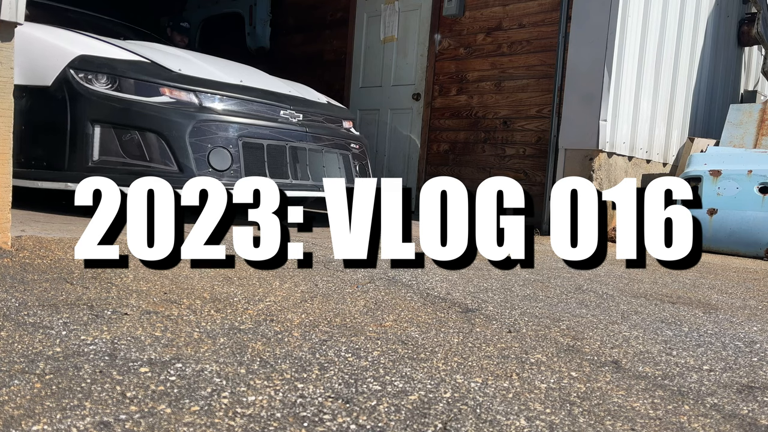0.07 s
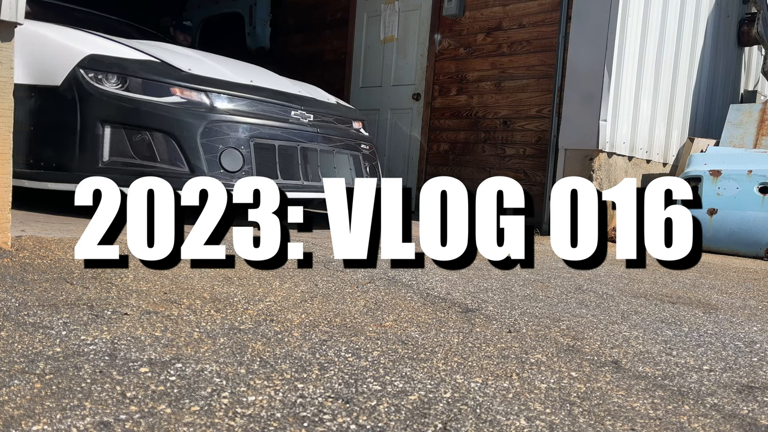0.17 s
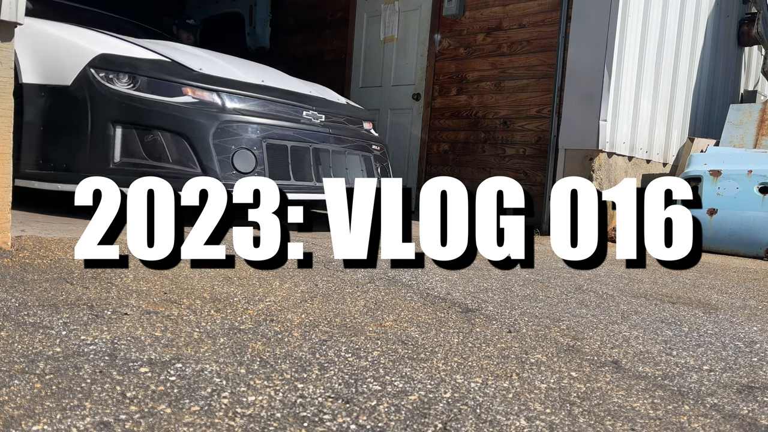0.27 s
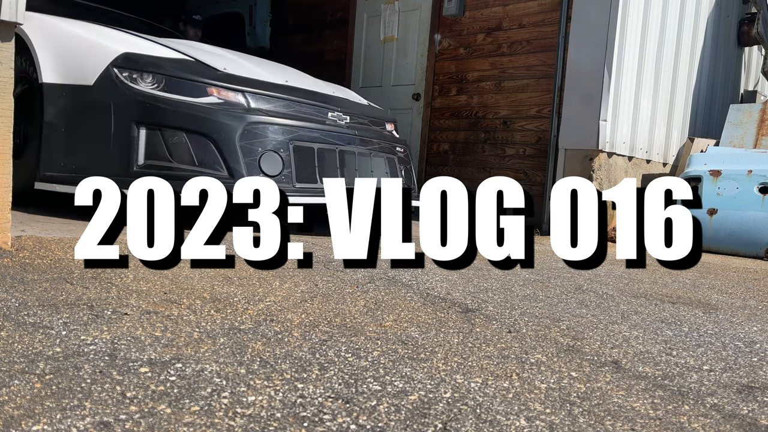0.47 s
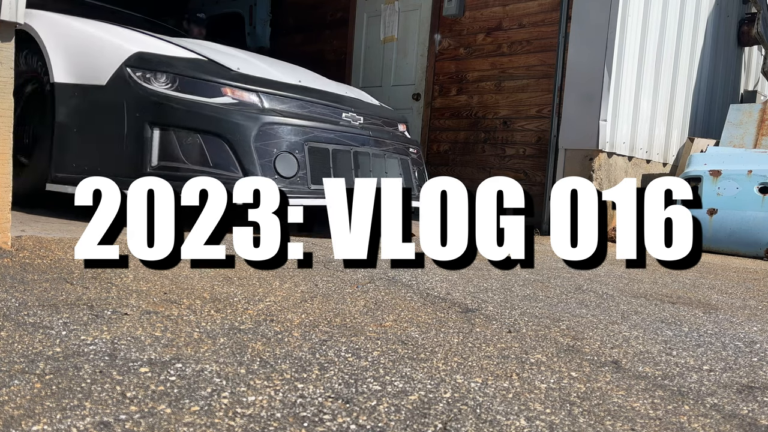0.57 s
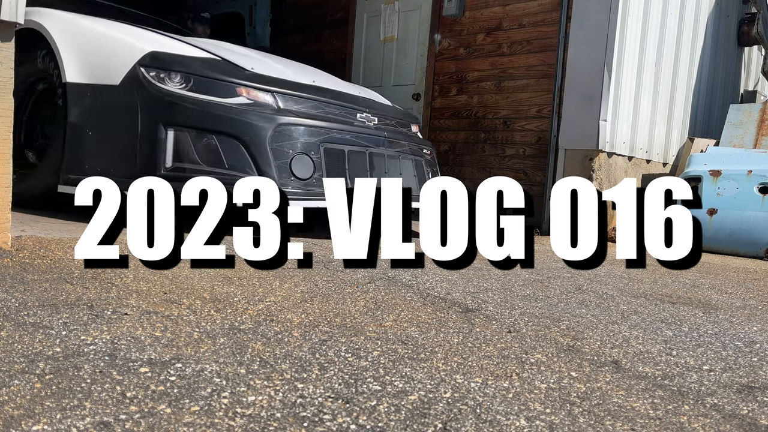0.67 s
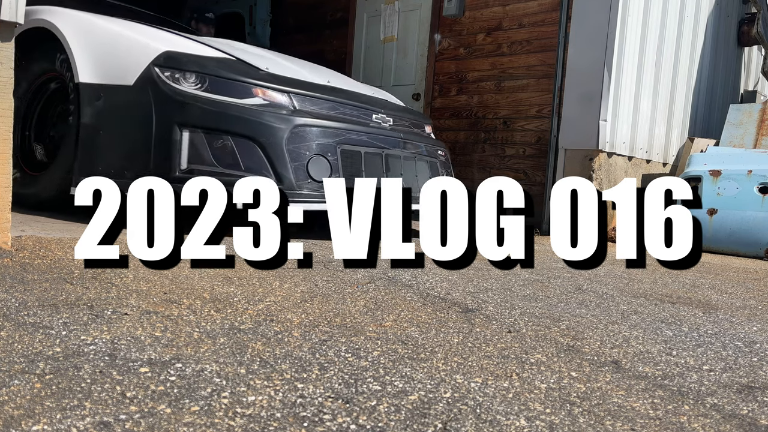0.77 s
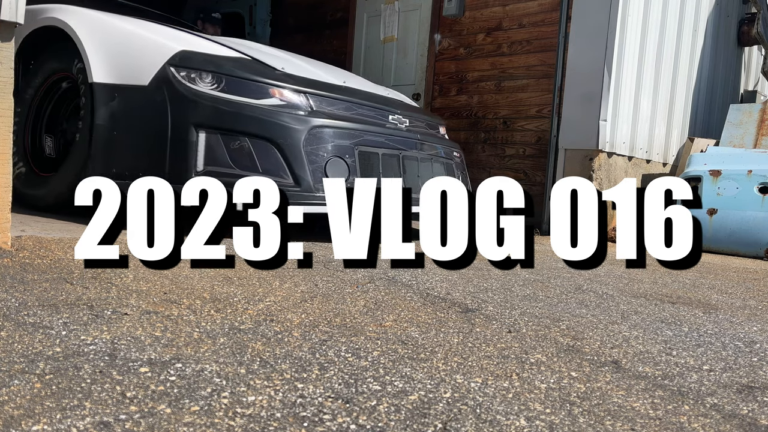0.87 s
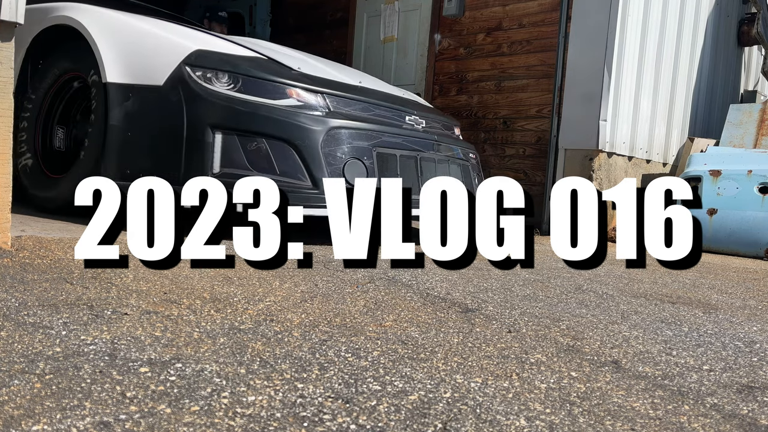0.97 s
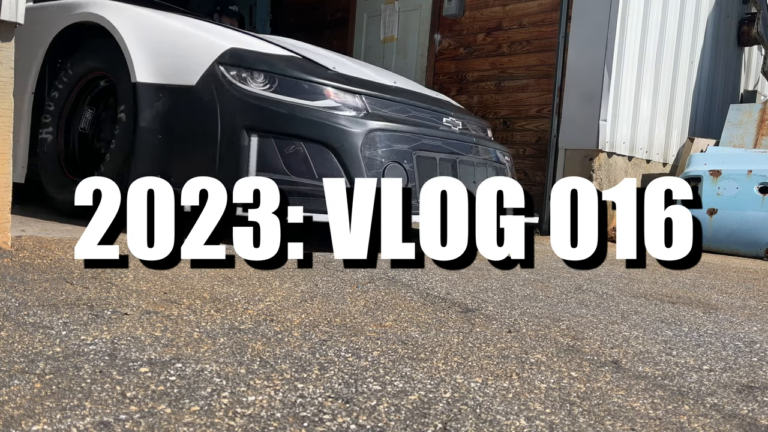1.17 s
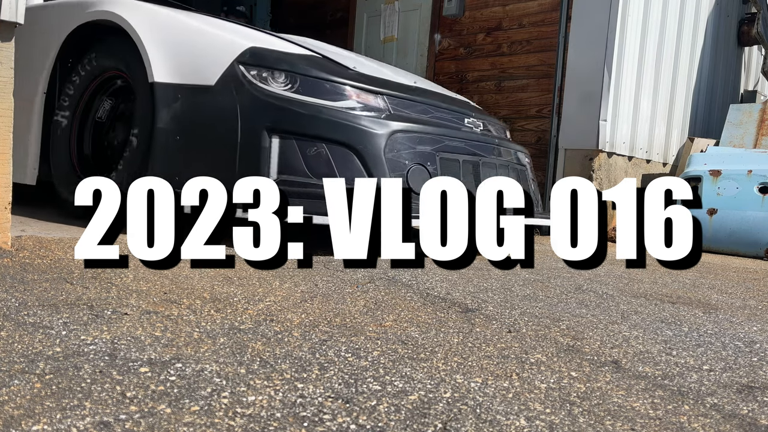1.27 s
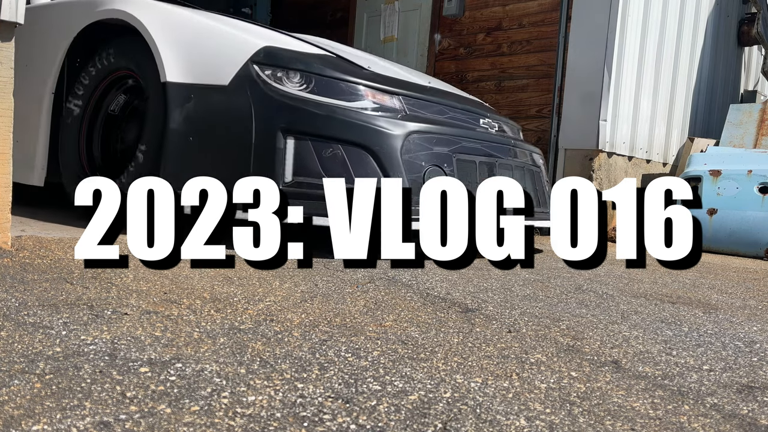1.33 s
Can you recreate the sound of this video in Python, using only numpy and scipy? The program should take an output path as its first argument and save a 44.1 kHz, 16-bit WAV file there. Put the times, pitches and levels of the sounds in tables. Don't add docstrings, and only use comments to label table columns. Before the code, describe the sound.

Close ground-level stereo pickup of a slow rolling tyre: quiet low rumble and thin grit hiss, a sharp knock midway, then dense crackling stones and deep bumps near the end, without any engine.

```python
import sys
import numpy as np
from scipy import signal
from scipy.fft import rfft, irfft, next_fast_len
from scipy.io import wavfile
from scipy.ndimage import uniform_filter1d

SR = 44100
rng = np.random.default_rng(int(sys.argv[2]) if len(sys.argv) > 2 else 0)


def to_wav(s):
    ch = np.atleast_2d(s).T
    pcm = np.round(np.clip(ch, -1, 1) * 32767)
    wavfile.write(sys.argv[1], SR, pcm.astype(np.int16))


def to_linear_factor(level_db):
    exponent = np.asarray(level_db, float) / 20
    return 10 ** exponent


N = 107515

# start [t/s], length [t/s], level [dB], narrow resonance [f/Hz]
RUBBER_SLIPS = [
    (0.25, .11, -62.5, 2460),
    (0.273, 0.097, -64, 2810),
    (.3, .06, -69, 3600),
    (0.26, .04, -65, 3200),
    (0.28, .075, -63, 4280),
    (.285, 0.053, -68.5, 4730),
    (0.35, .03, -66, 1480),
    (1.36, 0.054, -56, 1790),
    (1.3, 0.034, -58, 4650),
    (1.245, 0.018, -54.5, 4400),
]
# start [t/s], length [t/s], level [dB], broad resonance [f/Hz]
SCUFF_PATCHES = [(0.244, 0.12, -67.5, 3900), (0.273, 0.096, -65.5, 6400), (0.94, 0.047, -58.5, 2500),
                 (0.402, 0.065, -64, 1900), (0.584, 0.16, -62, 1000), (1.047, 0.14, -64, 14000),
                 (1.34, 0.094, -61, 15500), (1.7, 0.065, -59, 1830), (1.23, 0.028, -48.5, 1500),
                 (1.25, 0.061, -51.5, 1500), (0.682, 0.063, -63.5, 2800), (0.275, 0.091, -68, 9000),
                 (2.5, .11, -59.5, 8700), (0.79, 0.21, -56, 560), (1.472, 0.044, -56, 4100),
                 (1.834, 0.1, -53.5, 1900), (1.836, 0.094, -59, 3000), (0.89, .1, -64, 4200),
                 (2.6, 0.032, -52.5, 2600), (2.31, 0.079, -50, 2540)]
# time [t/s], level [dB]
GRIT_LEVEL = [(.07, -60.5), (.2, -60), (.4, -61.5), (.55, -60.5), (.75, -60.5), (.9, -56.5), (1.0, -51.5),
              (1.15, -56.5), (1.3, -54), (1.45, -53), (1.68, -54.5), (1.8, -50), (1.87, -42.5), (1.97, -47),
              (2.05, -48), (2.2, -44.5), (2.33, -46), (2.43, -47)]
# frequency [f/Hz], density [level/dB per Hz]
GRIT_COLOUR = [(250, -38), (400, -8), (800, -16), (1500, -20), (2500, -21), (7000, -33), (14000, -33.5),
               (16200, -67)]
# time [t/s], peak [level/dB], pitch [f/Hz]
STONE_KNOCKS = [(.411, -51.5, 850), (.652, -45, 900), (.704, -52, 696), (.853, -45.5, 750),
                (1.027, -50, 940), (1.232, -46, 1280), (1.235, -30.5, 1700), (1.2388, -26.5, 1020),
                (1.2388, -28.5, 1800), (1.2439, -30, 840), (1.2452, -31, 4300), (1.2447, -32.5, 1960),
                (1.2465, -37, 620), (1.662, -42, 850), (1.822, -42, 696), (1.848, -34.5, 1000),
                (1.9035, -32, 1300), (2.031, -39, 2800), (2.088, -39, 1200), (2.113, -39, 1300),
                (2.127, -38, 1010), (2.1932, -27, 920), (2.193, -32.5, 1740), (2.1991, -33, 1300),
                (2.207, -38, 1200), (2.24, -40, 1500), (2.2985, -34, 1710), (2.3034, -35, 1800),
                (2.318, -40, 1500), (2.342, -37, 1500), (2.349, -30.5, 2300), (2.36, -36, 2000),
                (2.367, -40, 1410)]
# time [t/s], peak [level/dB], ring [f/Hz], treble snap [level/dB]
STONE_CRACKS = [(0.4116, -44.5, 4600, -12), (0.6523, -39.5, 920, -28), (.773, -47.5, 6900, -15),
                (.981, -45, 5000, -3), (0.992, -46, 4500, -8), (1.048, -46, 4530, -10),
                (1.069, -43, 4000, 5), (1.205, -45, 2290, -1), (1.236, -38, 4400, 2),
                (1.2383, -33.5, 4500, 3.5), (1.2433, -29, 4830, 0), (1.533, -40, 1900, -12),
                (1.58, -35, 5460, -2.5), (1.729, -42.5, 5460, -16.5), (1.739, -44.5, 5670, -14),
                (1.767, -37.5, 2970, 2), (1.813, -41.5, 2200, -12), (1.83, -43, 1800, -10),
                (1.841, -30.5, 2900, -4), (1.8465, -37, 2010, -14), (1.862, -49, 2700, -12),
                (1.868, -35.5, 2780, 5), (1.876, -41, 2600, -10), (1.883, -29, 1900, -8),
                (1.887, -37, 1800, -7), (1.9025, -34, 2200, -1), (1.9071, -30, 2300, 5),
                (1.912, -39.5, 3000, -4), (1.916, -44, 1800, -14), (1.9224, -25.5, 1880, 6.5),
                (1.9223, -25, 4250, 4.5), (1.9246, -27.5, 3080, 5.5), (1.955, -37, 2780, -8),
                (1.976, -39, 3000, 7), (2.067, -34, 2740, -11), (2.089, -31, 2420, -13),
                (2.096, -30.5, 2910, -5), (2.139, -34.5, 2520, -2), (2.176, -38, 2800, -8),
                (2.194, -40, 4500, -12), (2.2, -41, 2600, -8), (2.207, -37, 3000, 7.5),
                (2.228, -40.5, 3100, -12), (2.2638, -34.5, 3500, -8), (2.2985, -32.5, 3280, -10),
                (2.3035, -28, 2600, -11), (2.318, -42, 2900, -14), (2.33, -46, 3200, -10),
                (2.336, -45, 4500, -8)]
# time [t/s], peak [level/dB], pitch [f/Hz]
LUMP_THUDS = [(.47, -36, 142), (0.599, -34, 181), (0.638, -34.5, 102), (0.811, -37.5, 120),
              (1.046, -37, 245), (1.256, -37, 111), (1.278, -32.5, 128), (1.292, -35.5, 120),
              (1.555, -35, 90), (1.676, -33, 170), (1.748, -32, 140), (1.863, -31, 104), (1.93, -28.5, 88),
              (1.959, -24.5, 63.4), (2.138, -34, 140), (2.372, -24.5, 240), (2.386, -26.5, 68)]
# time [t/s], carcass [level/dB], extra depth [level/dB]
TYRE_WEIGHT = [(.08, -56, 1), (.35, -51.5, 0.5), (.49, -44.5, -7.5), (.56, -48, -3), (.62, -45, -3),
               (.75, -46, 4), (.84, -43, -4), (0.968, -46, 0), (1.04, -38.5, -4.5), (1.2, -41, -6.5),
               (1.45, -46.5, 3), (1.62, -41.5, -4), (1.78, -41.5, 1.5), (1.899, -38, 4.5),
               (2.05, -38.5, 4.5), (2.2, -39.5, 2.5), (2.32, -42, 6), (2.43, -43.5, 7.5)]
# pitch [f/Hz], strength [level/dB], decay by 60 dB [t/s]
TYRE_RESONANCES = [(49, -12, 0.21), (64.2, -0.5, 0.19), (88, -3.5, 0.26), (120, -3.5, 0.14),
                   (147, -2.5, 0.13), (183.9, -0.5, 0.2), (240, -6.5, 0.16), (290, -6, 0.067),
                   (336.3, -10.5, 0.049), (497, -18, 0.018)]
# frequency [f/Hz], lead [phase/rad]
LEFT_LEAD = [(350, 0), (1120, .6), (1550, .9), (1900, 0), (3190, 1.6), (5000, 0), (6720, -1.3),
             (7550, -2.3), (7750, -np.pi), (8850, -np.pi), (9100, -4), (10800, -5.6), (11100, -2 * np.pi),
             (12900, -2 * np.pi), (13200, -7), (14300, -8), (14700, -3 * np.pi)]
# frequency [f/Hz], difference [level/dB]
LEFT_OVER_RIGHT = [(300, -.4), (700, 1.3), (4000, 2.0), (7400, 1.5), (7750, 0), (8850, 0), (9200, 1.5),
                   (10700, 1.5), (11100, 0)]
# frequency [f/Hz], strength [level/dB]
UNLIKE_PART = [(60, -17.5), (300, -14.5), (900, -4), (1900, -9.5), (3500, -3.5), (5000, -9.5), (6500, -2)]

SLIPS_PER_S = 1500
TREBLE_HZ = 6400
ALIKE_ABOVE_HZ = 7400


def rms_one(x):
    return x / np.sqrt(np.mean(x ** 2) + 1e-20)


def at_hz(points, hz):
    table_hz, values = np.transpose(points)
    return np.interp(np.log(hz + 1), np.log(table_hz + 1), values)


def filtered(x, order, hz, kind="high"):
    return signal.sosfilt(signal.butter(order, hz, kind, fs=SR, output="sos"), x)


def add_at(out, start_s, sound):
    i = int(start_s * SR)
    out[i:i + len(sound)] += sound[:N - i]


def drift(rate):
    r = np.exp(-80 * np.pi * rate / SR)
    slow = signal.lfilter([1], [1, -2 * r, r * r], rng.standard_normal(N // 40 + 2002))[2000:]
    return np.interp(np.arange(N) / 40, np.arange(len(slow)), rms_one(slow))


def evened(x):
    even_s = 0.3
    return x / np.sqrt(uniform_filter1d(x ** 2, size=int(even_s * SR)) + 1e-20)


def ring(x, hz, t60):
    r, w = to_linear_factor(-60 / (t60 * SR)), 2 * np.pi * hz / SR
    return signal.lfilter([0, np.sin(w)], [1, -2 * r * np.cos(w), r * r], x + 1e-18)


def clicks(per_s, spread_db):
    sizes = to_linear_factor(spread_db * np.minimum(rng.exponential(1, N), 5)) * rng.choice([-1, 1], N)
    return rms_one(sizes * (rng.random(N) < per_s / SR))


def swell(start_s, length_s):
    through = np.clip((np.arange(N) / SR - start_s) / length_s, 0, 1)
    return np.sqrt(np.sin(np.pi * through) + 1e-9)


def soft_push(t, hz, push):
    return push * np.exp(1 - push) * np.sin(2 * np.pi * hz * t)


def slipping():
    drive = clicks(SLIPS_PER_S, 2.7) + 0.5 * rng.standard_normal(N)
    out = np.zeros(N)
    for s, length, db, hz in RUBBER_SLIPS:
        out += to_linear_factor(db) * swell(s, length) * rms_one(ring(drive, hz, t60=0.016))
    return out


def scuffs():
    width, air_db = 1.73, -17
    out = np.zeros(N)
    slips = clicks(SLIPS_PER_S, 0.9) + 0.8 * rng.standard_normal(N)
    air = to_linear_factor(air_db) * rms_one(filtered(slips, 2, TREBLE_HZ))
    for s, length, db, hz in SCUFF_PATCHES:
        body = rms_one(ring(slips, hz, width / hz * 2))
        out += to_linear_factor(db) * swell(s, length) * (body + air * (length > .03))
    return out


def grit(level_db, clump):
    grains_per_s, spread_db, clump_db = 900, 3, 3
    grain_db, hiss_db = -6.5, -2.5
    grains = clicks(grains_per_s * to_linear_factor(clump_db * clump), spread_db)
    edges = 250 * 2 ** np.arange(0, 6.4, 1 / 3)
    out = np.zeros(N)
    for low, high in zip(edges, edges[1:]):
        drive = to_linear_factor(grain_db) * grains * rng.standard_normal(N)
        drive += to_linear_factor(hiss_db) * rng.standard_normal(N)
        band = evened(filtered(drive, 2, [low, high], "band"))
        band_db = at_hz(GRIT_COLOUR, np.sqrt(low * high)) + 1.55 * drift(9.6)
        out += band * np.sqrt(high - low) * to_linear_factor(band_db)
    return to_linear_factor(level_db + clump * 0.39) * rms_one(out)


def knocks():
    cycles = 6.1
    out, t = np.zeros(N), np.arange(SR // 40) / SR
    for s, db, hz in STONE_KNOCKS:
        add_at(out, s, to_linear_factor(db) * soft_push(t, hz, 10 * t * hz / cycles))
    return out


def cracks():
    crack_s, tail_s, tail_db = 0.00057, 0.01, -18
    ring_cycles, ring_db = 7.2, 0.5
    chip_hz, chip_db = (900, 5960), -32
    out, t = np.zeros(N), np.arange(SR // 25) / SR
    envelope = t / crack_s * np.exp(1 - t / crack_s) + to_linear_factor(tail_db) * np.exp(-t / tail_s)
    for s, db, hz, treble_db in STONE_CRACKS:
        burst = rng.standard_normal(len(t)) * envelope
        burst[int(crack_s * SR)] += 4.0
        parts = [(ring(burst, hz, ring_cycles / hz), ring_db),
                 (filtered(burst, 1, chip_hz, "band"), chip_db),
                 (filtered(burst, 2, TREBLE_HZ), treble_db)]
        for part, part_db in parts:
            add_at(out, s, to_linear_factor(db + part_db) * part / np.abs(part).max())
    return out


def thuds():
    cycles, trim_db = 2.16, -3
    out, t = np.zeros(N), np.arange(SR // 8) / SR
    for s, db, hz in LUMP_THUDS:
        add_at(out, s, to_linear_factor(db + trim_db) * soft_push(t, hz, 4 * t * hz / cycles))
    return out


def carcass(level_db, depth_db):
    lumps_per_s, spread_db, grind_db = 220, 1, -1.5
    deep_hz, soft_hz = 100, 488
    lumps = clicks(lumps_per_s * to_linear_factor(3 * drift(8)), spread_db)
    drone = np.zeros(N)
    for hz, db, t60 in TYRE_RESONANCES:
        shake = lumps * rng.standard_normal(N) + to_linear_factor(grind_db) * rng.standard_normal(N)
        drone += to_linear_factor(db + depth_db * (hz < deep_hz)) * evened(ring(shake, hz, t60))
    drone = filtered(drone, 4, 40)
    return to_linear_factor(level_db - 4.5) * filtered(drone, 2, soft_hz, "low")


def ports(near, far):
    size = next_fast_len(N + 2048)
    hz = np.arange(size // 2 + 1) * SR / size
    turn = np.exp(.5j * at_hz(LEFT_LEAD, hz)) * to_linear_factor(.5 * at_hz(LEFT_OVER_RIGHT, hz))
    alike = rfft(near, size)
    unlike = rfft(far, size) * to_linear_factor(at_hz(UNLIKE_PART, hz)) * (hz < ALIKE_ABOVE_HZ)
    left = irfft((alike + unlike) * turn, size)[:N]
    right = irfft((alike - unlike) / turn, size)[:N]
    return np.array([left, right])


def scene():
    t = np.arange(N) / SR
    s, body, depth = np.transpose(TYRE_WEIGHT)
    body_db, depth_db = np.interp(t, s, body), np.interp(t, s, depth)
    grit_db, clump = np.interp(t, *np.transpose(GRIT_LEVEL)), drift(20.5)
    stones = filtered(cracks(), 3, 600)
    hits = slipping() + scuffs() + knocks() + stones

    fade_t = np.arange(SR // 50) / SR
    scatter = rng.standard_normal(len(fade_t)) * np.exp(-fade_t / 0.0015)
    echo = signal.fftconvolve(hits, scatter / np.linalg.norm(scatter))[:N]

    lumps = thuds()
    near = grit(grit_db, clump) + carcass(body_db, depth_db) + lumps + hits
    far = grit(grit_db, clump) + carcass(body_db, depth_db) + lumps + echo
    stray = to_linear_factor(-5) * filtered(stones, 2, ALIKE_ABOVE_HZ)
    return ports(near, far) + stray * [[0], [1]]


def top_cut(x):
    return signal.sosfilt(signal.butter(12, 16480, fs=SR, output="sos"), x)


def record(dry):
    top_hz, start_s = 16000, .0725
    cut = signal.sosfilt(signal.cheby2(12, 70, top_hz + 500, fs=SR, output="sos"), dry)
    mix = cut * (np.arange(N) > start_s * SR)
    return top_cut(mix)


dry = scene()
out = record(dry)
to_wav(out)
```